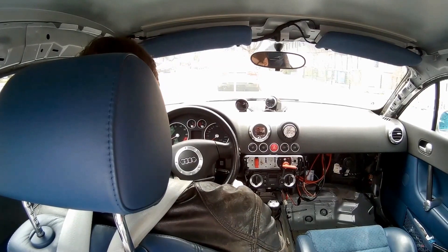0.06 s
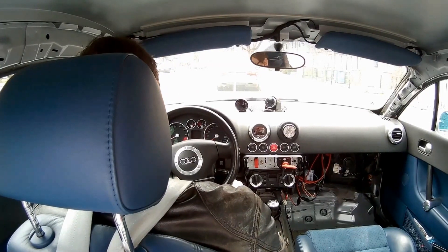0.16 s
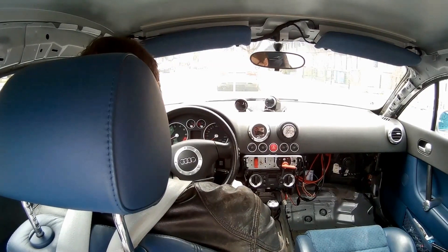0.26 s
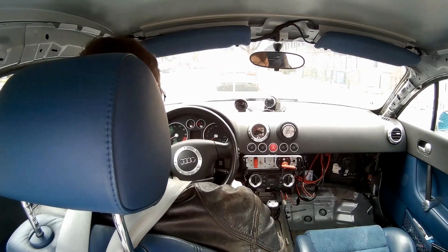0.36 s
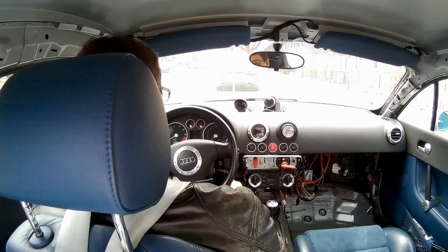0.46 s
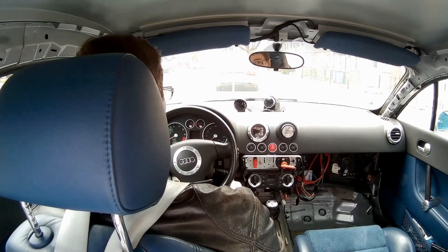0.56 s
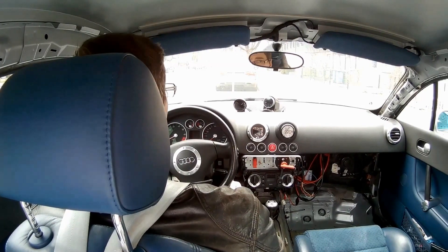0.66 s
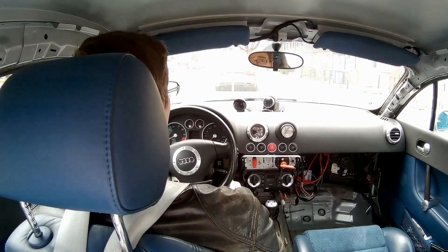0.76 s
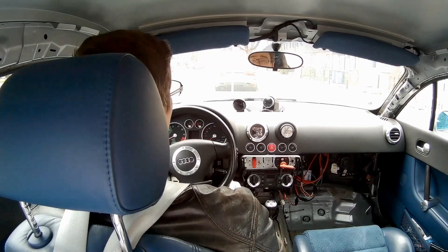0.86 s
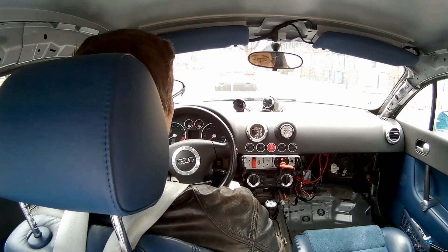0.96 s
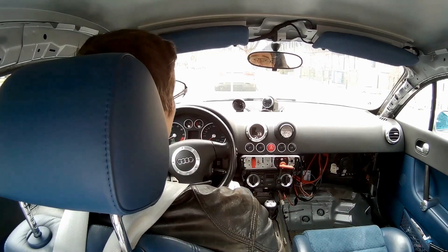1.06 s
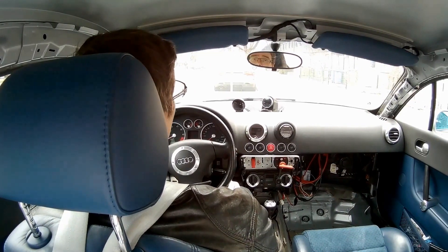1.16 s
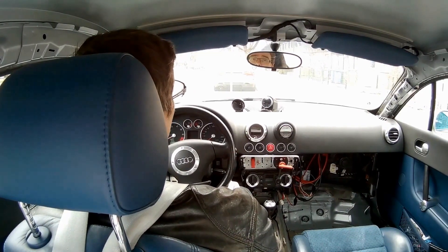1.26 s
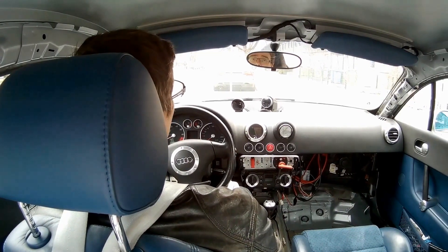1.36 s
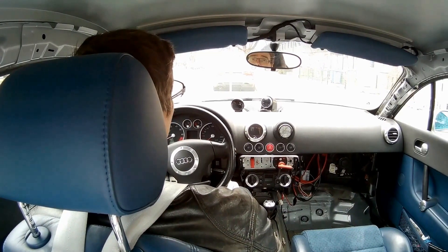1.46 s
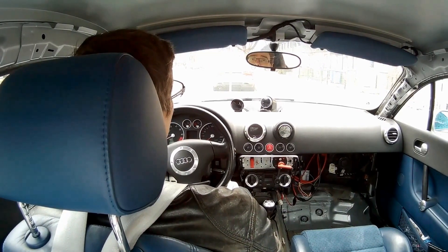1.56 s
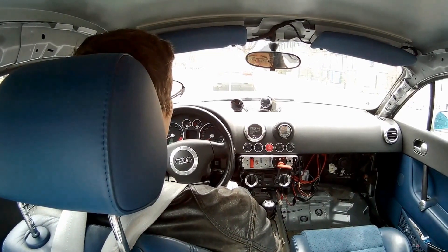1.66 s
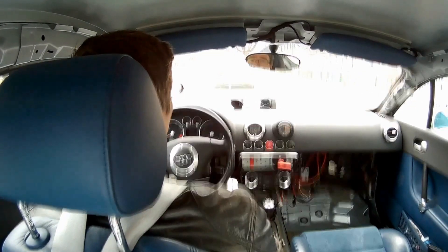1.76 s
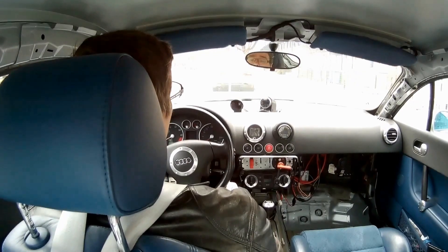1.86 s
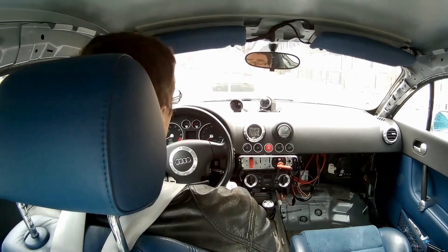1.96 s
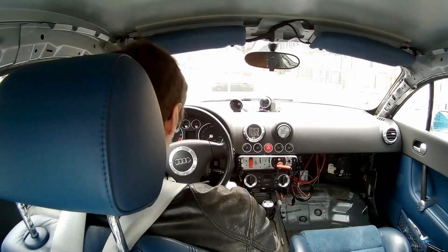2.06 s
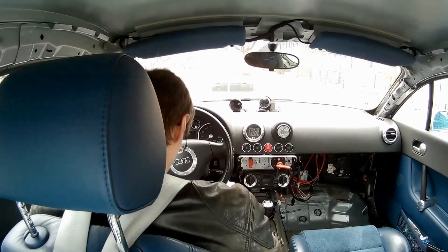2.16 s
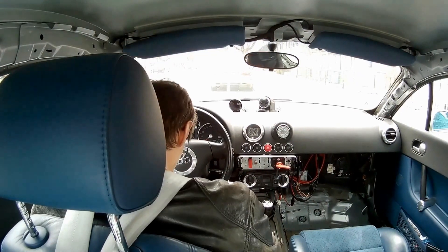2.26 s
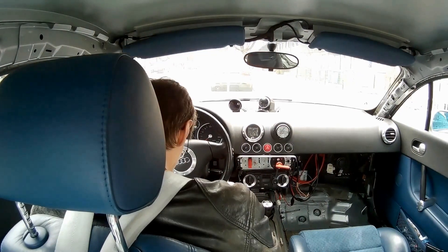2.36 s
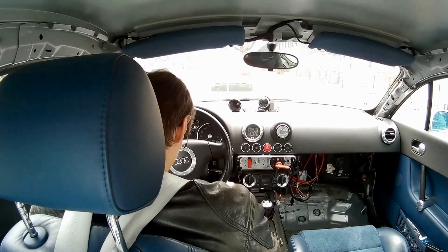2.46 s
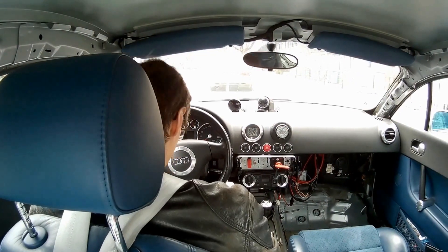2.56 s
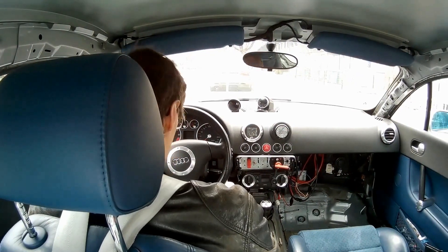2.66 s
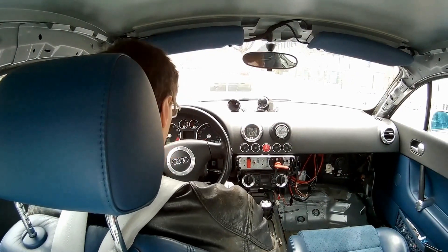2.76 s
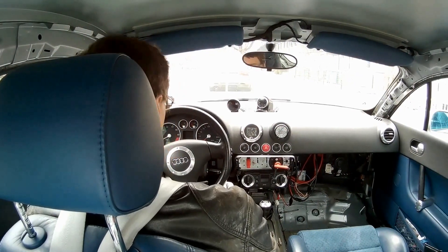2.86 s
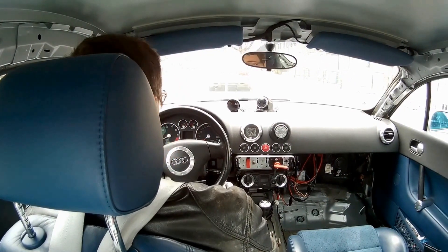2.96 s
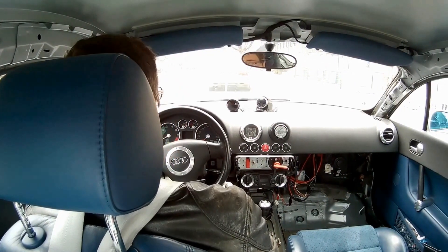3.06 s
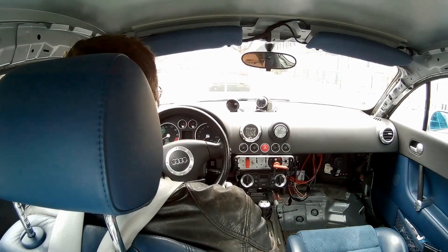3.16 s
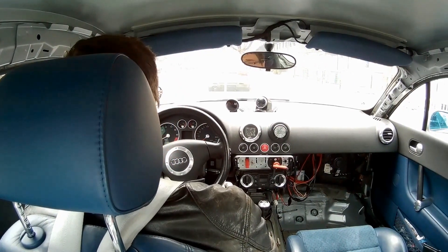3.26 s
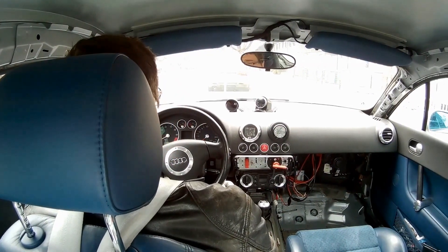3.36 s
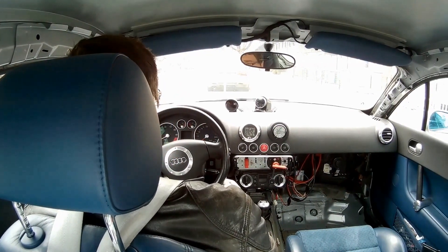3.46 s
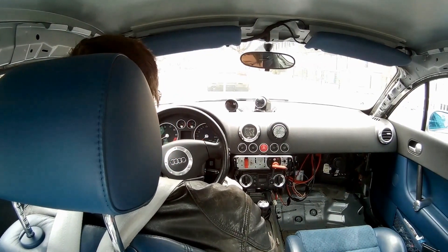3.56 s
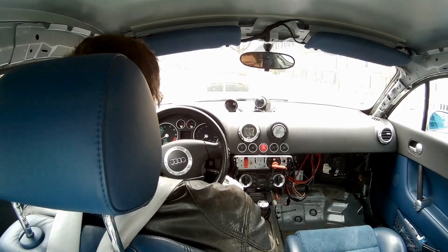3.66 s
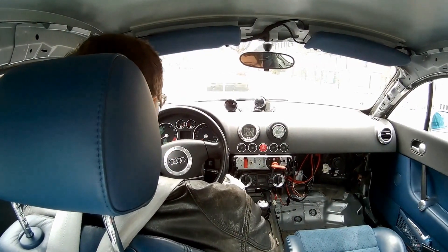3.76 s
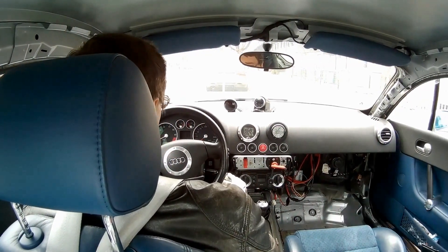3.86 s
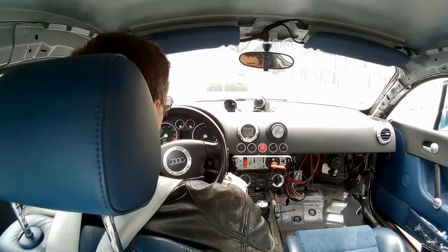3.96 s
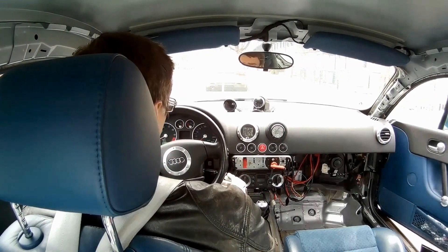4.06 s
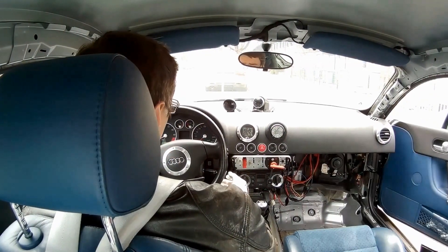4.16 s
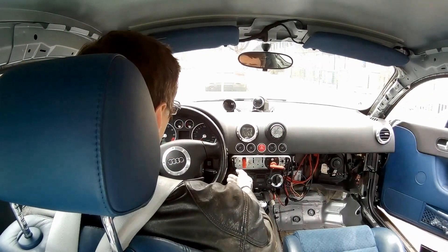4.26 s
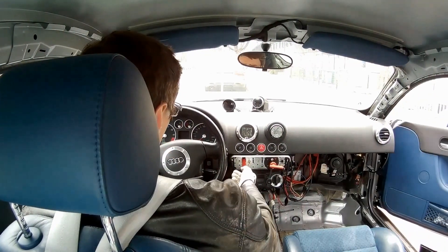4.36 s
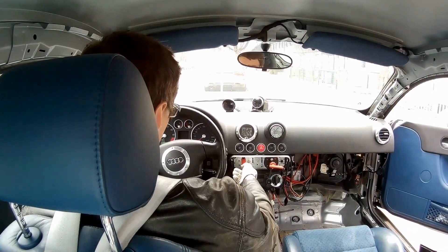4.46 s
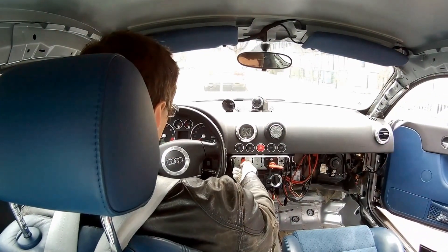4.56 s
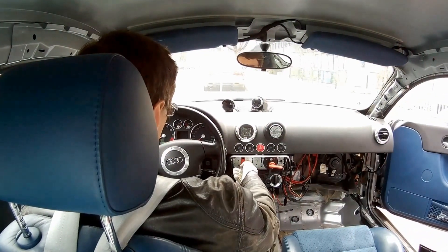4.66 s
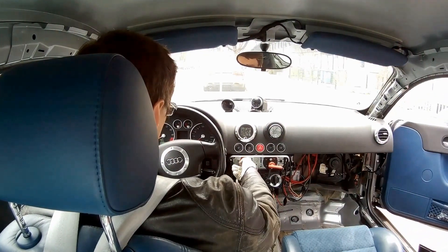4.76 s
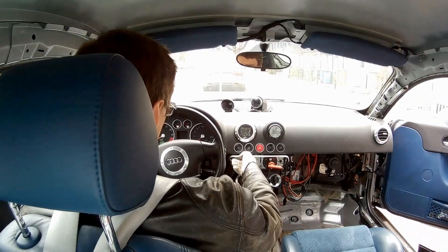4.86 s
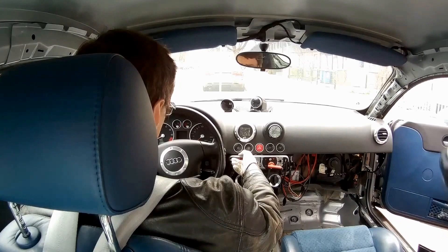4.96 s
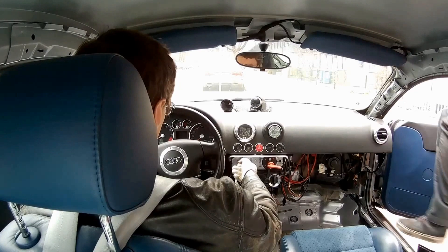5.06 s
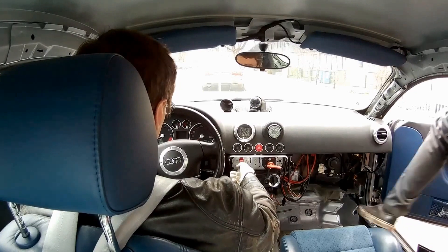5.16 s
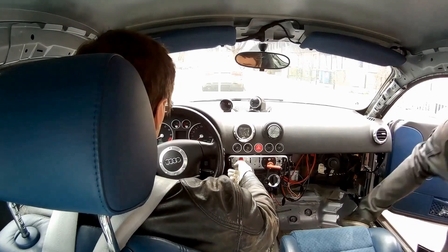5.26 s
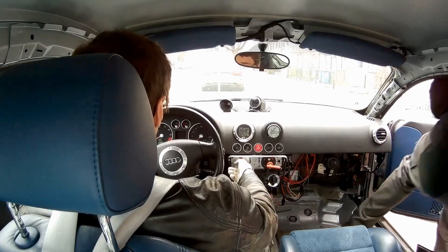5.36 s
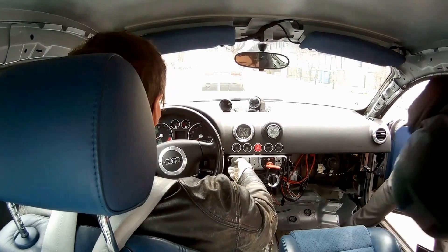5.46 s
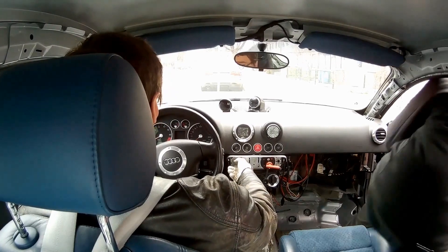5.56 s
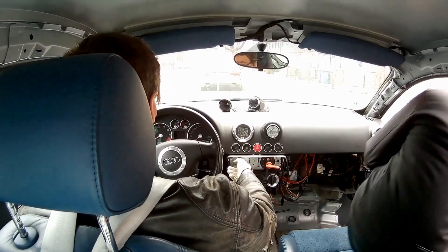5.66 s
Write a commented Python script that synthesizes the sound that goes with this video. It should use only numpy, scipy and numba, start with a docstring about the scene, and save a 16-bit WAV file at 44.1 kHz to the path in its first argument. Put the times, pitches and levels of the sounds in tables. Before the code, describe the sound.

Inside a stripped car, a door slams with a huge distorted boom, leather rubs, then another door unlatches, swings open and feet bump in.

```python
"""Inside a stripped-out car, the driver's door slams: a push of cabin air, latch blows and ringing shell modes
overload the microphone. Leather rubs and creaks (shaped noise, gliding squeals); the passenger door unlatches
and swings out on its ticking stay (struck panel modes, slow air swings); someone steps in, bumping the floor pan.
Street noise (shaped noise) comes in while a door is open; a still cabin and a faint whine lie beneath."""
import sys
import numpy as np
from scipy import signal
from scipy.fft import rfft, irfft
from scipy.io import wavfile
from scipy.ndimage import uniform_filter1d
from numba import njit

SR = 44100
rng = np.random.default_rng(int(sys.argv[2]) if len(sys.argv) > 2 else 0)


def generate_wav(signal):
    """Clip the signal to [-1, 1] and save it as 16-bit WAV at the path in sys.argv[1]."""
    frames = np.transpose(np.atleast_2d(signal))
    scaled = np.clip(frames, -1, 1) * 32767
    pcm = np.round(scaled).astype(np.int16)
    wavfile.write(sys.argv[1], SR, pcm)


N = 251811
T = np.arange(N) / SR  # [s]

# Hit tables: (time [s], level [dB], brightness [dB/octave], ring length [factor on t60])
# Mode tables: (frequency [Hz], level [dB], t60 [s]); spectra: (frequency [Hz], density [dB per Hz, relative])

# Slam, latch and frame contacts: hit table
SLAM_HITS = [(1.8695, -12, -3.5, 1.1), (1.8815, -6, -1, 0.46), (1.8900, -5.5, 0.5, .4),
             (1.9012, 5, 2, 0.14), (1.9125, -24, -1.5, .8), (1.938, -32, 0, .65), (1.956, -43, 0, .7)]
# Latch and door frame: mode table
LATCH_MODES = [(473.4, 1, 0.16), (566.4, -2.5, 0.19), (727, -6, 0.18), (990, -6, 0.11), (1315, -1.5, 0.16),
               (1600, 4, .1), (1720, 1.5, .1), (2100, -2, .09), (2403, 3, .075), (2560, -2, .07),
               (3250, -5, .08), (7970, -24, 0.21)]
# Latch crack: spectrum
LATCH_CRACK = [(100, -3), (300, -3), (900, 2.5), (1750, 1.5), (2450, 1), (3300, -6), (4000, -24),
               (6500, -32), (8200, -21), (10000, -26), (15000, -28)]
# Shell and its air; light panels respond late: (frequency [Hz], level [dB], t60 [s], rise [s])
SHELL_MODES = [(25.9, 5, 0.23, .0006), (42, 5.5, .15, .0006), (61.2, 8.5, 0.21, 0.0011),
               (74.5, 7.5, 0.14, .0006), (89.1, 2.5, .17, .0006), (128, -5, .21, .0006),
               (161, -12, 0.22, .0006), (37.99, -15, .85, .05), (67.8, -23.5, 0.97, .05),
               (82, -45, 2.7, .1), (98, -27.5, 0.79, 0.046), (122, -51, 3.2, .1), (160, -19, 0.68, .25),
               (190, -26.5, 0.95, 0.33), (238, -45, 2.6, 0.22), (258, -20, 0.84, 0.47),
               (310, -40, 0.72, 0.12), (390, -53, 1.2, .2)]
# Passenger door, latch and seal letting go, end stop: hit table
DOOR_HITS = [(3.7555, -21, -1.5, 0.57), (3.7620, -15.5, 2, 0.31), (3.7685, -11.5, 1, 0.58),
             (3.778, -19.5, 1, 0.86), (3.825, -29, 2, 1.0), (3.955, -34, -4.5, 1.23),
             (4.227, -46, -5.5, .75), (4.412, -42, -2, 1.4), (4.424, -39, -6.5, 1.02)]
# Catches, the handle then the notches of the stay:
# (time [s], knock level [dB], brightness [dB/octave], ring length [factor on t60])
DOOR_CATCHES = [(3.721, -40.5, -5.5, 1.7), (3.904, -31.5, 0.5, 0.88), (4.03, -44.5, -4.5, 1.3),
                (4.111, -38.5, -2.5, .75), (4.198, -49.5, -2, .58), (4.299, -45, -3.5, 0.8)]
# Passenger door panel: mode table
DOOR_MODES = [(115, -12, 0.52), (179, -9.5, 0.36), (220.7, -7.5, .36), (277.4, -1, 0.16), (304, -0.5, 0.24),
              (384, -10, 0.31), (468, -13.5, 0.19), (561, -10.5, 0.32), (670, -4, 0.24), (743.3, 2, 0.19),
              (926, 0.5, 0.15), (1073, -2.5, 0.2), (1186, -7, 0.25), (1287, -1.5, 0.18), (1910, -11.5, .14),
              (2420, -30.5, 0.16), (4940, -29.5, 0.17)]
# Passenger door clatter: spectrum
DOOR_CLATTER = [(50, -10), (150, -7), (300, 2.5), (450, 1.5), (800, 2), (1300, -3), (1800, -11.5),
                (3000, -28.5), (5200, -35.5), (6200, -47.5), (14000, -60)]
# Feet and knees on floor and sill: hit table
STEP_HITS = [(5.012, -55, -1, 1.2), (5.292, -47, 3, .7), (5.314, -46, -3.5, .85), (5.402, -41, -9, 1.9),
             (5.432, -45, -6, 1.2), (5.481, -44, -7, 0.9), (5.5145, -31, -0.5, .68),
             (5.692, -38.5, -6.5, 1), (5.702, -49, 9.5, 0.7)]
# Floor pan: mode table
FLOOR_MODES = [(121, -10, .2), (196, 1, 0.35), (256, -9, 0.13), (367, 1, 0.13), (465, 2.5, 0.1),
               (649, 2, .16), (1040, -21, .12)]
# Thud of a sole: spectrum
FLOOR_THUD = [(50, -5.5), (200, 9), (700, -0.5), (1400, -11.5), (2500, -21), (6000, -58), (14000, -59)]
# Loose fittings, shaken by slam, driver and door: hit table
FITTING_HITS = [(1.905, -33, 1, .85), (2.452, -67.5, -0.5, 1.3), (3.365, -78, -2.5, 0.93),
                (3.871, -62, 7, 0.87), (4.435, -68, -2, 1.15), (5.002, -62, -3.5, 1.5)]
# Small fittings: mode table
FITTING_MODES = [(2320, 2, 0.17), (2600, -6, 0.19), (3550, -4, .15), (4550, -1, 0.14)]
# Tick of the fittings: spectrum
FITTING_TICK = [(500, -6.5), (2000, 3.5), (4700, -4.5), (6500, -14), (8500, -9), (12000, -17.5),
                (15000, -25)]
# Leather, cloth and door seal sliding, one row per movement; swell and fade span 20 dB:
# (peak time [s], swell [s], fade [s], swish level [dB], rub level [dB])
SLIDES = [(2.185, .06, .07, -82, -53), (2.28, .21, .52, -68.5, -62), (2.40, .2, .22, -76, -59.5),
          (3.82, .1, .45, -68, -60), (3.95, .17, .24, -75, -46.5), (4.14, .2, .4, -77, -67),
          (4.5, .7, .4, -71, -71), (4.96, .15, .42, -67, -74), (5.015, .05, .45, -73, -60),
          (5.305, .02, .16, -64, -53), (5.387, .09, .23, -55, -41), (5.6, .22, .25, -59, -59)]
# Leather squeaks: (time [s], length [s], pitch [Hz], glide [Hz/s], width [Hz], level [dB])
CREAKS = [(2.27, .125, 860, -1900, 420, -57.5), (2.37, .055, 890, 200, 400, -59),
          (2.375, .13, 1620, 1900, 500, -63), (5.22, .1, 10620, 2600, 50, -76)]
# Bright swish of sliding: spectrum
SWISH_SPECTRUM = [(1500, -6), (2500, -1.5), (4200, -0.5), (6000, -6.5), (8200, -1.5), (9600, -7),
                  (11500, -1), (13000, -6.5), (15500, -15.5)]
# Leather rubbing on the seat: spectrum
RUB_SPECTRUM = [(120, -18), (250, -2), (600, 0), (800, -2), (1150, 1.5), (1500, -8), (2100, -13.5),
                (3000, -26), (4600, -22), (7000, -42), (10000, -59)]
# Street noise: spectrum
STREET_SPECTRUM = [(15, -36.5), (25, -4), (75, -2), (146, -3.5), (301, -2), (344, -6), (415, -1.5),
                   (573, -6.5), (978, -2), (1090, 0), (2430, -17), (2780, -26), (9270, -36.5),
                   (12800, -31.5), (15000, -39.5)]
# Cabin noise, also the door's rumble: spectrum
CABIN_SPECTRUM = [(12, -53.5), (20, -18.5), (70, -5.5), (126, -8.5), (144, -19.5), (196, -10), (324, -14),
                  (2030, -30.5), (2210, -32.5), (4070, -39), (13100, -43), (15500, -47)]

SEAL_S, BOOM_S = 1.862, 1.8815  # driver's door meets its seal, lands on the frame
UNLATCH_S, SWING_S = 3.755, .5  # passenger door leaves its seal, time to swing open
DRIVER_GAP_DB, PASSENGER_GAP_DB = -56, -65.5  # street noise through each open door
# Tick level against knock; knock level with neutral tick; brightness lost per dB of harder knock
CATCH_TICK_DB, CATCH_NEUTRAL_DB, CATCH_DULLING_DB_PER_OCTAVE_PER_DB = -16.5, -40, .45


def slam():
    """Air push, latch and frame contacts, and the boom of the shell's modes."""
    latch = blows(SLAM_HITS, LATCH_MODES, LATCH_CRACK,
                  crack_db=3, crack_t60_s=0.13, treble_damping=.02, contact_s=.0003)
    # the panels trade energy, so the modes come to waver after the boom starts
    unrest = 0.58 * np.clip((T - BOOM_S) / 0.14, 0, 1)
    boom = np.zeros(N)
    for hz, db, t60_s, rise_s in SHELL_MODES:
        waver = 1 + unrest * walk(35)
        boom += swing(BOOM_S, hz, db, t60_s, rise_s) * waver
    return air_push(db=-12.5, grow_s=.014, leak_s=.008) + latch + boom


def air_push(db, grow_s, leak_s):
    """Cabin pressure builds as the door nears its seal, then leaks out of the vents."""
    t = T - SEAL_S
    pulse = np.exp(-np.logaddexp(-t / grow_s, t / leak_s))  # 1/2 at SEAL_S
    return -2 * undb(db) * pulse


def passenger_door():
    """Latch lets go, seal pulls at the cabin air, door wobbles and rumbles out along its stay."""
    knocks = blows(DOOR_HITS + DOOR_CATCHES, DOOR_MODES, DOOR_CLATTER,
                   crack_db=-2, crack_t60_s=0.26, treble_damping=0.12, contact_s=0.0004)
    pop = swing(3.754, hz=45, db=-22, t60_s=.1, rise_s=.001)
    suction = -swing(3.785, hz=8.3, db=-8.5, t60_s=0.36, rise_s=0.0026)
    wobble = swing(4.07, hz=24.07, db=-32.5, t60_s=1.55, rise_s=0.071)
    end_stop = swing(4.412, hz=62.6, db=-48, t60_s=0.55, rise_s=0.022)
    end_stop += swing(4.44, hz=29.1, db=-42.5, t60_s=1.87, rise_s=.03)
    rumble = colour(rng.standard_normal(N), CABIN_SPECTRUM) * undb(-51.5)
    rumble *= stroke(peak_s=4.1, swell_s=.4, fade_s=1.0)
    return knocks + pop + suction + wobble + end_stop + rumble


def ticks():
    """Light metal and plastic parts click, alone or with each catch of the door."""
    snaps = []
    for s, knock_db, _, length in DOOR_CATCHES:
        bright_db = CATCH_DULLING_DB_PER_OCTAVE_PER_DB * (CATCH_NEUTRAL_DB - knock_db)
        snaps.append((s, knock_db + CATCH_TICK_DB, bright_db, length))
    return blows(FITTING_HITS + snaps, FITTING_MODES, FITTING_TICK,
                 crack_db=8.5, crack_t60_s=0.23, treble_damping=0.13, contact_s=0.0022)


def climbing_in():
    """Feet bump on the floor pan and the car rocks under the weight."""
    bumps = blows(STEP_HITS, FLOOR_MODES, FLOOR_THUD,
                  crack_db=1.5, crack_t60_s=0.22, treble_damping=0.27, contact_s=0.0017)
    rock = swing(5.15, hz=29.14, db=-46, t60_s=2.9, rise_s=0.084)
    return bumps + rock


def clothes(grain_db, flutter_db):
    """Leather and cloth slide in countless tiny slips: a bright swish, a duller rub, brief creaks."""
    out = sum(squeal(*creak) for creak in CREAKS)
    strokes = np.array([stroke(*slide[:3]) for slide in SLIDES])
    swish_db, rub_db = np.transpose(SLIDES)[3:]
    for spectrum, db in ((SWISH_SPECTRUM, swish_db), (RUB_SPECTRUM, rub_db)):
        slips = rng.standard_normal(N) * undb(grain_db * rng.standard_normal(N))
        strength = np.sqrt(undb(db) ** 2 @ strokes ** 2)  # movements add in power
        out += colour(slips, spectrum) * strength * undb(flutter_db * walk(60))
    return out


def squeal(s, length_s, hz, glide_hz_per_s, width_hz, db):
    """A narrow friction resonance, as leather sticks and slips, swells, glides and stops."""
    t = np.clip(T - s, 0, length_s)
    phase = 2 * np.pi * (hz + glide_hz_per_s * t / 2) * t
    band = walk(width_hz) * np.sin(phase) + walk(width_hz) * np.cos(phase)
    return band * undb(db) * np.sin(np.pi * t / length_s)


def stroke(peak_s, swell_s, fade_s):
    """Strength of one movement: swells to its peak and dies away, linear in dB."""
    return undb(-20 * np.maximum((peak_s - T) / swell_s, (T - peak_s) / fade_s))


def background():
    """Distant traffic through the open doors, the still cabin, and a faint electronic whine."""
    street = colour(rng.standard_normal(N), STREET_SPECTRUM)
    street *= street_level(wash_db=-50.5, wash_t60_s=2.0) * undb(1.0 * walk(7))
    cabin = colour(rng.standard_normal(N), CABIN_SPECTRUM) * undb(-64.5 + .5 * walk(1.8))
    whine = undb(-85) * np.sin(2 * np.pi * 12790 * T + .8 * walk(200))
    return street + cabin + whine


def street_level(wash_db, wash_t60_s):
    """Outside noise follows the gaps of the two doors; after the slam a wash dies away."""
    driver = undb(DRIVER_GAP_DB) * (T < BOOM_S)
    wash = undb(wash_db) * fade(np.maximum(T - BOOM_S, 0), wash_t60_s) * (T >= BOOM_S)
    passenger = undb(PASSENGER_GAP_DB) * np.clip((T - UNLATCH_S) / SWING_S, 0, 1)
    return driver + wash + passenger


def blows(hits, modes, crack, crack_db, crack_t60_s, treble_damping, contact_s):
    """Each blow rings clear modes and a dense cloud of short panel modes that dies sooner in the treble."""
    out = np.zeros(N)
    t = np.arange(SR // 2) / SR
    bins_hz = np.fft.rfftfreq(len(t), 1 / SR)
    octave = np.log2(np.maximum(bins_hz, 20) / 1000)  # re 1 kHz
    bands = np.unique(np.round(octave))[:, None]
    band_t60_s = crack_t60_s * 2 ** (-treble_damping * bands)
    hz, db, t60_s = np.transpose(modes)[:, :, None]
    for s, level_db, bright_db, length in hits:
        spot_db = 2.0 * rng.standard_normal(hz.shape)  # each point of contact favours other modes
        gains = undb(db + spot_db + bright_db * np.log2(hz / 1000))
        phases = rng.uniform(0, 2 * np.pi, hz.shape)
        partials = gains * np.sin(2 * np.pi * hz * t + phases) * fade(t, t60_s * length)
        ring = np.sum(partials, axis=0) / np.sqrt(np.sum(gains ** 2) / 2)

        dense = rfft(rng.standard_normal(len(t)))
        dense = dense * undb(shape_db(crack, bins_hz) + bright_db * octave)
        cloud = irfft(dense * (np.round(octave) == bands), len(t))  # one row per octave
        cloud /= np.std(cloud.sum(axis=0))
        cloud = np.sum(cloud * fade(t, band_t60_s * length), axis=0)

        onset = 1 - np.exp(-t / contact_s)
        add(out, s, undb(level_db) * onset * (ring + undb(crack_db) * cloud) / np.sqrt(2))
    return out


def swing(s, hz, db, t60_s, rise_s):
    """One slow mode set going at time s."""
    t = np.maximum(T - s, 0)
    return undb(db) * np.sin(2 * np.pi * hz * t) * fade(t, t60_s) * (1 - np.exp(-t / rise_s))


def undb(db):
    """Decibels to gain."""
    return 10 ** (np.asarray(db) / 20)


def unit(x):
    """Scale to rms 1."""
    return x / np.sqrt(np.mean(x ** 2))


def fade(t, t60_s):
    """Exponential decay, 60 dB down after t60_s."""
    return np.exp(-np.log(1000) * t / t60_s)


def shape_db(spectrum, hz):
    """Read a spectrum on a log-frequency axis."""
    points_hz, db = np.transpose(spectrum)
    return np.interp(np.log(hz + 1), np.log(points_hz), db)


def colour(x, spectrum):
    """Give a signal a spectrum, at rms 1."""
    hz = np.fft.rfftfreq(len(x), 1 / SR)
    return unit(irfft(rfft(x) * undb(shape_db(spectrum, hz)), len(x)))


def walk(rate_hz):
    """Smooth random wander at rms 1: held random values, smoothed twice."""
    k = int(SR / rate_hz)
    held = np.repeat(rng.standard_normal(N // k + 1), k)
    return unit(uniform_filter1d(uniform_filter1d(held, k), k)[:N])


def add(out, s, sound):
    """Mix a sound in at time s."""
    start = int(s * SR)
    part = sound[:max(N - start, 0)]
    out[start:start + len(part)] += part


def scene():
    """Sum of all sources at the microphone, one channel."""
    doors = slam() + passenger_door() + ticks()
    people = climbing_in() + clothes(grain_db=3, flutter_db=1.0)
    return (doors + people + background())[None]


@njit
def follow(x, attack, release):
    """Level follower with separate attack and release, as fractions per sample."""
    out, e = np.empty(len(x)), 0.
    for i in range(len(x)):
        e += (abs(x[i]) - e) * (attack if abs(x[i]) > e else release)
        out[i] = e
    return out


def gain_control(x, ceiling_db, threshold_db, attack_s, release_s):
    """Turn the gain down while the level, read with peaks held to the ceiling, is over the threshold."""
    limited = np.minimum(np.abs(x), undb(ceiling_db))
    level = follow(limited, 1 / (attack_s * SR), 1 / (release_s * SR))
    return x / np.maximum(level / undb(threshold_db), 1)


def overload(x, ceiling_db, leak_db):
    """Flatten the peaks against a ceiling that yields only slightly."""
    flat = x / (1 + (x / undb(ceiling_db)) ** 6) ** (1 / 6)
    return flat + undb(leak_db) * x


def record(dry):
    """The gain control is too slow for the slam, so the input clips; deepest bass and top are cut."""
    ceiling_db = -8.0
    x = gain_control(dry[0], ceiling_db, threshold_db=-15.0, attack_s=.025, release_s=0.17)
    x = overload(x, ceiling_db, leak_db=-37.5)
    bass_cut = signal.butter(1, 2.5, "high", fs=SR, output="sos")
    top_cut = signal.ellip(10, .2, 70, 15800, fs=SR, output="sos")
    return signal.sosfilt(top_cut, signal.sosfilt(bass_cut, x))[None]


dry = scene()
out = record(dry)
generate_wav(out)
```